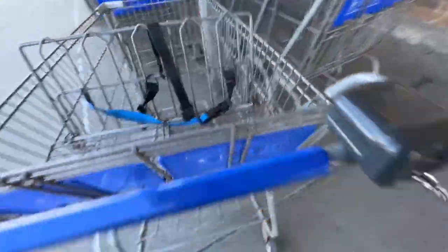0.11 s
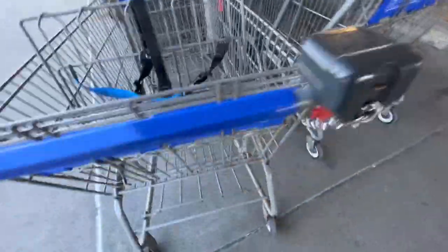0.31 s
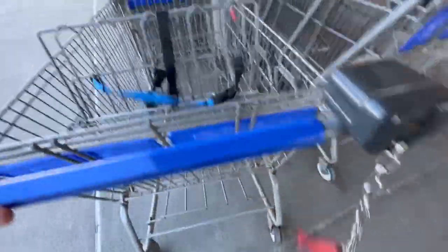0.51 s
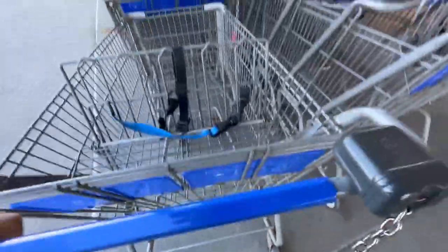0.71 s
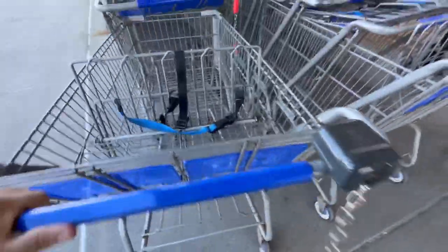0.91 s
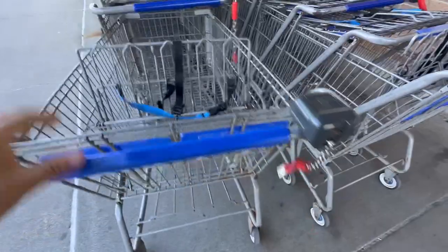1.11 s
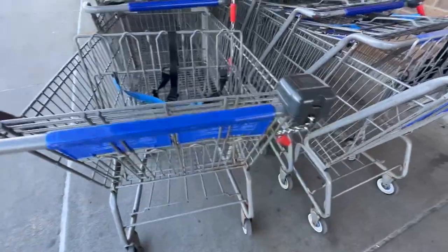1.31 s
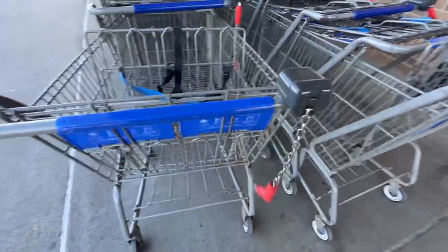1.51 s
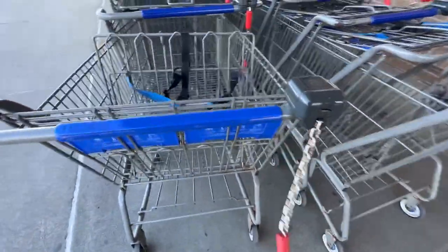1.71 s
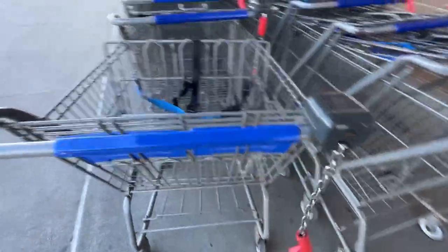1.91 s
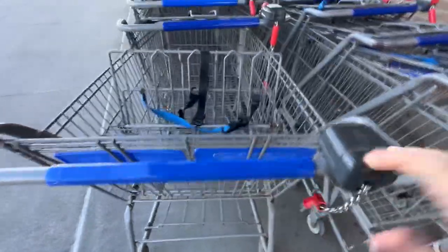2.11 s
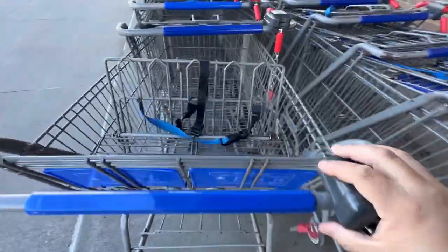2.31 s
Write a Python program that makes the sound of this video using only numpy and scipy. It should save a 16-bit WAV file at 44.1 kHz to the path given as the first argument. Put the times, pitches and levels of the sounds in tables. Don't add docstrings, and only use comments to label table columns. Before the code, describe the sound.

Close up outdoors, a wire shopping cart bangs and clatters, wheels droning and chain links clinking sharply, before fading to sparse metallic pings, a brief caster squeak and a light jingle above faint traffic wash.

```python
import sys
import numpy as np
from scipy import signal
from scipy.fft import rfft, irfft, next_fast_len
from scipy.io import wavfile
from scipy.ndimage import uniform_filter1d, minimum_filter1d

SR = 44100
rng = np.random.default_rng(int(sys.argv[2]) if len(sys.argv) > 2 else 0)


def elevation(decibels):
    levels = np.asarray(decibels, float)
    return 10 ** (levels / 20)


def generate_wav(sig):
    pcm = np.round(np.clip(np.atleast_2d(sig).T, -1, 1) * 32767).astype(np.int16)
    wavfile.write(sys.argv[1], SR, pcm)


N = 105840
TIME = np.arange(N) / SR

# start in seconds, peak in dB, share of the deepest mode in dB.
JOLTS = [(0.23, -13.5, -10), (0.253, -28.5, -11), (0.285, -40, -4), (0.335, -25.5, -11.5),
         (0.38, -23.5, -12.5), (0.418, -18, -33), (0.501, -18.5, -9), (0.529, -19, -23),
         (0.556, -18.5, -25.5), (0.66, -26.5, -16), (0.709, -23, -19), (0.868, -29.5, -7),
         (0.911, -29.5, -18), (0.987, -28, -25.5), (1.061, -19.5, -22.5), (1.211, -23.5, -19),
         (1.338, -24, -16), (1.438, -28, -26), (1.874, -34, -14.5), (1.972, -40.5, -13)]


def read(points, hz):
    f, value = np.transpose(points)
    return np.interp(np.log(hz + 1), np.log(f + 1), value)


def evened(x):
    return x / np.sqrt(np.mean(x ** 2) + 1e-20)


def shaped(x, gain):
    size = next_fast_len(N + SR // 4, real=True)
    size += size % 2
    return irfft(rfft(x, size) * gain(np.fft.rfftfreq(size, 1 / SR)), size)[..., :N]


def ring(hz, db, t60, size=8000):
    t = np.arange(size)[:, None] / SR
    return (elevation(db - 60 * t / t60) * np.sin(2 * np.pi * np.asarray(hz) * t)).sum(1)


def clicks(per_s, spread_db):
    size = elevation(spread_db * np.minimum(rng.exponential(1, N), 4)) * rng.choice([-1., 1.], N)
    return size * (rng.random(N) < per_s / SR)


def strikes(rows, sounds):
    out = np.zeros(2 * N)
    for row, sound in zip(rows, sounds):
        start = round(row[0] * SR)
        out[start:][:len(sound)] += elevation(row[1]) * sound
    return out[:N]


def traffic():
    # frequency in Hz, level in dB per Hz.
    spectrum = [(20, -15), (60, 4), (100, 0.5), (250, -8), (800, -11), (2000, -20.5), (5000, -45.5),
                (16000, -70)]
    level_db, swell_db, start_dip_db = -39, 0.6, 7
    swell = evened(sum(np.sin(2 * np.pi * (f * TIME + rng.random())) / np.sqrt(f)
                       for f in np.geomspace(.4, 9, 20)))
    level = level_db + swell_db * swell - start_dip_db * np.exp(-(TIME / .5) ** 4)
    return elevation(level) * evened(shaped(rng.standard_normal(N), lambda f: elevation(read(spectrum, f))))


def wheels():
    # time in seconds, level in dB.
    roll = [(0.0, -39.5), (0.21, -39), (0.23, -21.5), (0.33, -39.5), (0.35, -24.5), (0.47, -40.5),
            (0.51, -32.5), (0.85, -45.5), (1.0, -37), (1.57, -38.5), (1.76, -37), (1.9, -35), (2.05, -41.5),
            (2.4, -49.5)]
    # frequency in Hz, width in Hz, level in dB.
    resonances = [(181.3, 33, -8), (351.4, 8, -1.5), (400, 40, -10), (676, 125, -13), (810, 320, -19.5)]
    bumps_per_s, level_db, idle_fork_db = 220, -0.5, -5.5
    grit = clicks(bumps_per_s, 1.5) + 0.12 * rng.standard_normal(N)

    def drummed(part):
        return shaped(grit, lambda f: sum(elevation(db) / (1 + (2 * (f - hz) / width) ** 2) ** 0.8
                                          for hz, width, db in part))

    low, high = drummed(resonances[:3]), drummed(resonances[3:])
    drone = low + high * elevation(np.where(TIME < JOLTS[0][0], idle_fork_db, 0))
    return elevation(level_db + np.interp(TIME, *np.transpose(roll))) * evened(drone)


def squeak():
    start_s, length_s, from_hz, to_hz, jitter_hz = 1.924, 0.026, 7800, 10500, 2700.0
    right_db, left_re_right_db = -31.5, -25
    u = np.clip((TIME - start_s) / length_s, 0, 1)
    jitter = jitter_hz * uniform_filter1d(rng.standard_normal(N), size=24)
    hz = from_hz + (to_hz - from_hz) * u + jitter
    tone = np.sin(np.pi * u) * np.sin(2 * np.pi * np.cumsum(hz) / SR)
    return elevation([[right_db + left_re_right_db], [right_db]]) * tone


def thumps():
    # start in seconds, level in dB, pitch in Hz, t60 in seconds.
    drops = [
        (0.228, -20.5, 56, 0.54),
        (0.232, -14.5, 158, 0.068),
        (0.237, -28, 95, 0.44),
        (0.527, -27, 60.6, 0.17),
        (0.534, -21, 92, 0.15),
        (0.989, -28, 194.9, 0.58),
        (1.041, -27, 89.5, 0.11),
    ]
    rise_s = 0.012
    rise = 1 - np.exp(-np.arange(24000) / SR / rise_s)
    return strikes(drops, [rise * ring([hz], 0, t60, size=24000) for _, _, hz, t60 in drops])


def frame():
    # frequency in Hz, level in dB, t60 in seconds.
    modes = [(56, -9, 0.4), (78, -27, 0.235), (150.5, -0.5, 0.12), (179, -5, 0.18), (203, 1, 0.18),
             (288, -12, 0.37), (335, -14.5, 0.14), (440.4, -4, 0.22), (660, -6.5, 0.23)]
    level_db, deep_db, detune, spread_db = -10.5, 5.5, 0.04, 1.34
    hz, db, t60 = np.transpose(modes)
    sounds = []
    for _, _, deep_share_db in JOLTS:
        chance = rng.normal(0, 1, (2, len(hz)))
        mode_db = level_db + db + spread_db * chance[1] + (hz < 70) * (deep_share_db + deep_db)
        sounds.append(-ring(hz * (1 + detune * chance[0]), mode_db, t60, size=16000))
    return strikes(JOLTS, sounds)


def clinks():
    # start in seconds, peak in dB, pitch in Hz.
    links = [(0.092, -43, 2720), (0.138, -36.5, 8600), (0.2304, -15, 9200), (0.3594, -16, 9800),
             (0.8704, -13, 8900), (0.8934, -3, 9600), (0.9777, -17, 9000), (1.1631, -4.5, 8700),
             (1.2994, -36, 2240), (1.4446, -32, 8650), (1.4944, -32, 1730), (1.5244, -41.5, 8700),
             (1.563, -27, 8950), (1.7649, -29.5, 5800), (1.8756, -25, 6700), (1.915, -20, 2580),
             (1.962, -19, 3400), (1.982, -20, 2420), (1.9974, -20, 8770)]
    crack_db, crack_t60_s, crack_rise_s = -7.5, 0.047, 0.0024
    ring_db, ring_t60_s = -27, .025
    t = np.arange(4000) / SR
    sounds = []
    for _, _, hz in links:
        envelope = elevation(crack_db - 60 * t / crack_t60_s * np.sqrt(hz / 5000))
        envelope *= 1 - np.exp(-t / crack_rise_s * (hz / 5000) ** 2)
        noise = uniform_filter1d(rng.standard_normal(4000), size=1 + (hz < 8800) + 2 * (hz < 7000))
        pole = np.clip(1.1 - hz / 6000, -.3, .9)
        crack = envelope * signal.lfilter([.5, -.45], [1, -pole], noise)
        modes_hz = np.clip(hz * np.exp(.25 * rng.standard_normal(14)), 500, 16000)
        sounds.append(crack + np.minimum(t / .002, 1) * ring(modes_hz, ring_db, ring_t60_s, size=4000))
    return strikes(links, sounds)


def pings():
    # start in seconds, peak in dB, pitch in Hz, t60 in seconds, left minus right in dB.
    struck = [(.005, -40.5, 434, .15, -2), (.092, -42, 3000, .012, 0), (.15, -40.5, 400, .12, 0),
              (.222, -27, 1910, 0.2, 10), (0.331, -28, 1510, .07, -3), (.335, -31, 2400, 0.11, 0),
              (0.354, -27, 1086, .12, 0), (0.386, -25, 1104, 0.16, 0), (.418, -18.5, 1150, .07, -2),
              (.47, -25, 1157, 0.11, -2), (.498, -17.5, 2190, 0.094, -6), (.502, -23.5, 1180, 0.13, 0),
              (0.529, -17.5, 1970, 0.12, -1), (.98, -33, 2230, .15, -2), (1.002, -28, 1300, .15, 3),
              (1.315, -27, 2270, 0.073, -8), (1.373, -34, 8300, .02, -8), (1.4442, -26.5, 8650, .03, 0),
              (1.4445, -36, 10500, .02, 0), (1.448, -30, 4900, 0.03, 6), (1.49, -39, 9100, .03, -8),
              (1.53, -40, 8800, 0.027, -8), (1.564, -36, 5320, 0.045, 11), (1.568, -41, 10500, .02, 4),
              (1.588, -50, 11600, 0.021, 0), (1.628, -47, 12400, .015, 0), (1.641, -40, 8300, .015, -8),
              (1.757, -58, 10900, 0.0093, 0), (1.781, -38, 343, 0.26, 0), (1.84, -34, 190, 0.29, 0),
              (1.865, -35, 375, 0.17, -8), (1.919, -34, 415, 0.23, 0), (1.971, -31.5, 400, .12, -3),
              (2.003, -40, 7300, 0.092, 5), (2.006, -41.5, 3440, 0.34, 11), (2.014, -33.5, 5850, 0.073, 7),
              (2.06, -43, 5600, .15, 5), (2.07, -45, 3500, .12, 4)]
    spread, rise_cycles = .03, 2
    t = np.arange(8000) / SR
    chance = rng.standard_normal((len(struck), 2, 3))
    chance = chance - chance.mean(2, keepdims=True)
    ports = []
    for port, side in enumerate((1, -1)):
        sounds = []
        for (_, _, hz, t60, lean_db), (common, differing) in zip(struck, chance):
            modes_hz = hz * (1 + spread * (common + (hz > 600) * port * differing))
            rise = 1 - np.exp(-t * hz / rise_cycles)
            sounds.append(rise * ring(modes_hz, side * lean_db / 2 - 5, t60))
        ports.append(strikes(struck, sounds))
    return np.array(ports)


def wires(colour, count=14, size=80):
    t60_ends_s = (.075, .05)
    hits_per_s, spread_db = 3500, 3
    out = np.zeros(N)
    turn_hz = rng.uniform(1, 4, (count, 1))
    turn = elevation(5 * np.sin(2 * np.pi * (turn_hz * TIME[::64] + rng.random((count, 1)))))
    for share in turn / np.sqrt((turn ** 2).mean(0)):
        hz = rng.uniform(300, 16300, size)
        t60 = np.interp(hz, [300, 16300], t60_ends_s) * rng.uniform(0.63, 0.95, size)
        db = read(colour, hz) + rng.normal(0, 2.4, size) - 10 * np.log10(t60)
        patch = ring(hz, db, t60, size=2500)
        knocks = np.repeat(share, 64)[:N] * clicks(hits_per_s / count, spread_db)
        out += signal.oaconvolve(knocks, patch)[:N]
    return evened(out)


def jingle():
    # frequency in Hz, level in dB.
    radiation = [(1500, -5.5), (3400, -0.5), (4950, -6), (5750, 2), (6650, -7.5), (7600, 0.5), (12200, -8),
                 (15000, -4.5)]
    # start in seconds, level in dB.
    nudges = [
        (1.775, -48.5),
        (1.997, -32.5),
        (2.013, -43),
        (2.065, -47.5),
    ]
    rise_s, t60_s, top_t60_s = 0.0019, 0.69, 0.26
    x = evened(shaped(wires(radiation, count=4), lambda f: elevation(read(radiation, f) / 2)))
    top = shaped(x, lambda f: f ** 4 / (f ** 4 + 5500.0 ** 4))

    def fade(t60):
        envelope = (1 - np.exp(-TIME / rise_s)) * elevation(-60 * TIME / t60)
        return strikes(nudges, [envelope] * len(nudges))

    return (x - top) * fade(t60_s) + top * fade(top_t60_s)


def bars():
    # frequency in Hz, level in dB, t60 in seconds.
    modes = [(726, -25, 0.07), (1100, 7, 0.15), (1160, -0.5, 0.12), (1255.5, 2.5, 0.24), (1475, 6.5, 0.066),
             (1680, -7, 0.19), (1975, -3.5, 0.17), (2240, -13, 0.082), (2260, -1, 0.11)]
    hits_per_s, t60_scale = 400, 0.25
    return evened(sum(signal.oaconvolve(clicks(hits_per_s / 3, 3.9), ring([hz], db, t60 * t60_scale))[:N]
                      for hz, db, t60 in modes))


def basket():
    # time in seconds, level in dB, gate flap share in dB, thick wire share in dB.
    shake = [(0, -45.5, 5, -5.5), (0.217, -45, -5, -6.5), (0.22, -36.5, 0, 1), (0.232, -21.5, -3, 4),
             (.26, -17.5, -27, -5.5), (.32, -20, -30, -1), (0.371, -17.5, 1, -0.5), (.44, -22.5, -13, 0),
             (0.51, -18.5, 2.5, 2), (.64, -20, -6.5, 0), (.86, -36.5, 2, -1), (.91, -27.5, 4.5, 1),
             (.974, -25, -1, -2.5), (0.98, -17.5, -0.5, 0), (1.1, -23.5, 0.5, -1), (1.311, -26.5, 2, -3.5),
             (1.65, -43.5, 6, -2.5), (1.72, -55.5, 13, 6)]
    # frequency in Hz, level in dB.
    radiation = [(300, -18), (900, -4), (2200, 6), (3500, 2), (7000, 2), (10000, -2.5), (13000, -5),
                 (16000, -6)]
    wire_db, bar_db, thick_below_hz = 1, -10, 4030
    bright_hz, bright_at_db, brightening = 9840, -34, 0.37
    s, db, flap_db, thick_db = np.transpose(shake)
    level = np.interp(TIME, s, db) - 40 * np.maximum(TIME - 1.998, 0)
    x = wires(radiation)
    top = shaped(x, lambda f: f ** 12 / (f ** 12 + float(bright_hz) ** 12))
    thick = shaped(x, lambda f: 1 / (1 + (f / thick_below_hz) ** 4))
    x = x + top * (elevation(brightening * (level - bright_at_db)) - 1)
    x = x + thick * (elevation(np.interp(TIME, s, thick_db)) - 1)
    return elevation(level) * (elevation(wire_db) * x + elevation(bar_db + np.interp(TIME, s, flap_db)) * bars())


def yard(x):
    t60_s, level_db = 0.3, -11
    at = np.arange(200, SR // 2, 20)
    taps = np.zeros(SR // 2 + 20)
    sign = rng.choice([-1., 1.], len(at))
    taps[at + rng.integers(0, 20, len(at))] = sign * elevation(-60 * at / SR / t60_s)
    return elevation(level_db) * signal.fftconvolve(x, taps / np.linalg.norm(taps))[:N]


def pair(a, b):
    # frequency in Hz, correlation from -1 to 1.
    likeness = [(130, .95), (290, .72), (640, .1), (10400, 0.), (10750, -1.), (12350, -1.), (12500, .2),
                (13100, .4), (13300, 1.)]

    def same(hz):
        return np.clip(read(likeness, hz), -1, 1)

    return np.array([a, shaped(a, same) + shaped(b, lambda hz: np.sqrt(1 - same(hz) ** 2))])


def limited(x):
    gain = np.minimum(.8 / (abs(x).max(0) + 1e-9), 1)
    return x * uniform_filter1d(minimum_filter1d(gain, size=200), size=200)


def scene():
    thin_hz, thin_width_hz, thin_db, centre_clink_db = 9220, 1300, 12, -9
    hits = frame() + thumps() + clinks()
    left, right = pair(*[x + yard(x) for x in (basket(), basket())])
    right = shaped(right, lambda f: elevation(thin_db * np.exp(-((f - thin_hz) / thin_width_hz) ** 2) * (f < 10900)))
    rest = pair(*[hits + yard(hits) + jingle() + wheels() + traffic() for _ in range(2)])
    return np.array([left, right]) + rest + squeak() + pings() + elevation(centre_clink_db) * clinks()


def band_limit(x):
    return signal.sosfilt(signal.butter(12, 16830, fs=SR, output="sos"), x)


def record(dry):
    # frequency in Hz, difference in dB.
    lean = [(400, 0), (1300, 2), (2400, 0.5), (4400, 6), (7000, 2.5), (10500, 0.5)]
    low_cut_hz, edge_hz, edge_width_hz = 51, 15850, 60

    def band(f):
        low_cut = (f / low_cut_hz) ** 4 / np.sqrt(1 + (f / low_cut_hz) ** 8)
        return .5 * (1 - np.tanh((f - edge_hz) / edge_width_hz)) * low_cut

    left, right = dry
    left = shaped(left, lambda f: band(f) * elevation(read(lean, f) / 2))
    right = shaped(right, lambda f: band(f) * elevation(-read(lean, f) / 2))
    return band_limit(limited(np.array([left, right])))


dry = scene()
out = record(dry)
generate_wav(out)
```